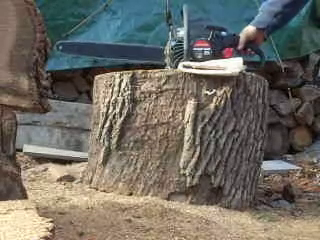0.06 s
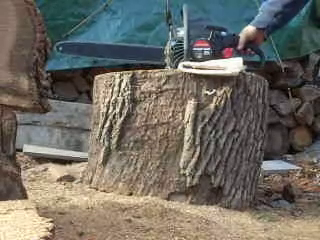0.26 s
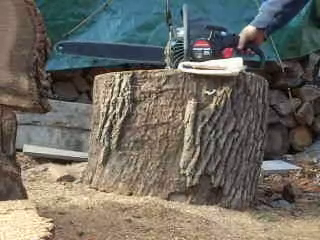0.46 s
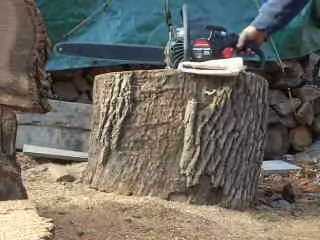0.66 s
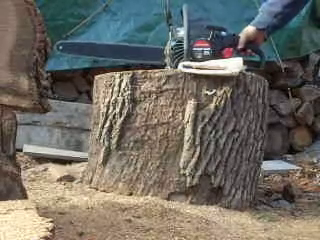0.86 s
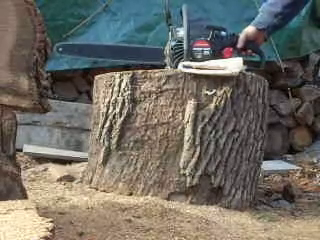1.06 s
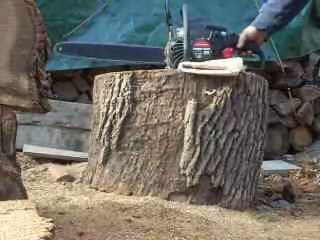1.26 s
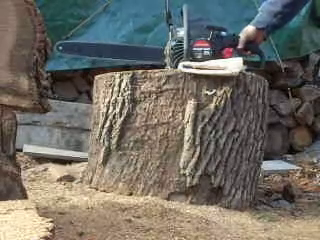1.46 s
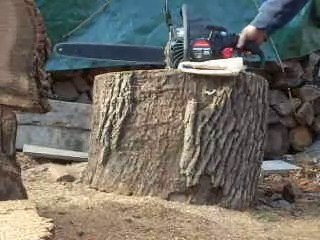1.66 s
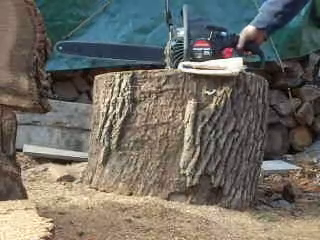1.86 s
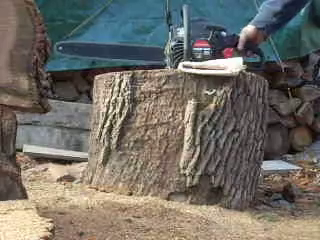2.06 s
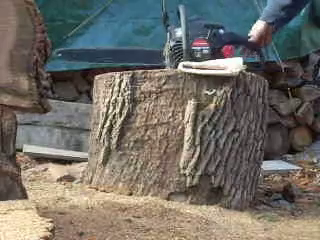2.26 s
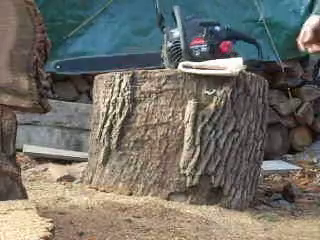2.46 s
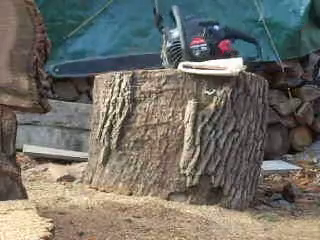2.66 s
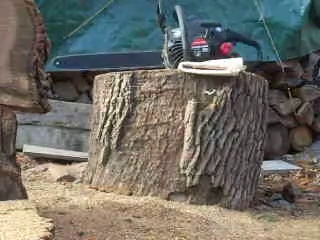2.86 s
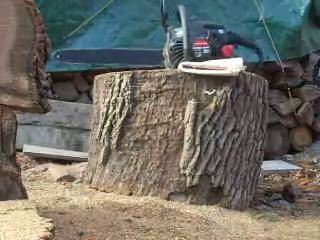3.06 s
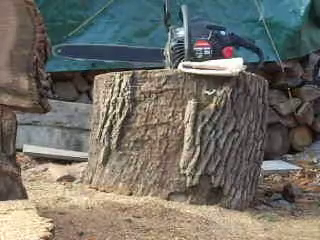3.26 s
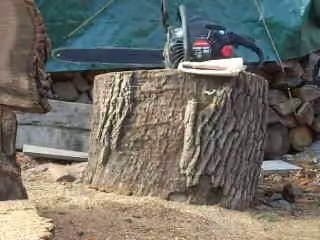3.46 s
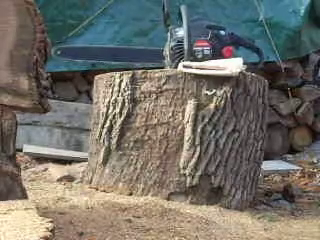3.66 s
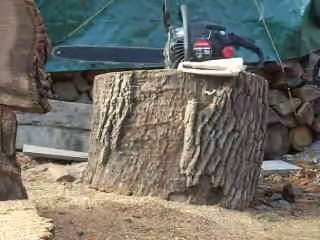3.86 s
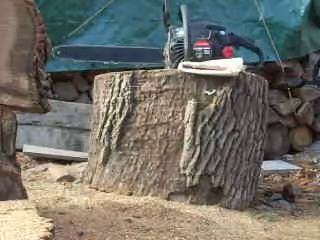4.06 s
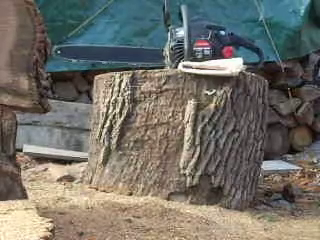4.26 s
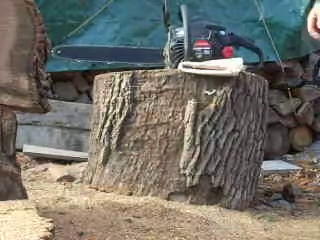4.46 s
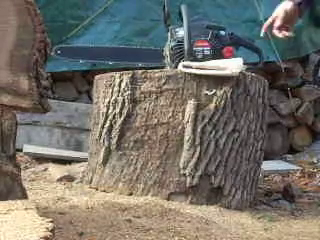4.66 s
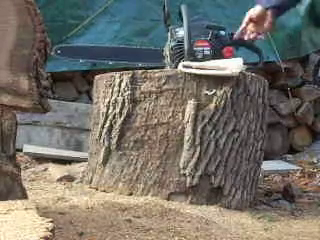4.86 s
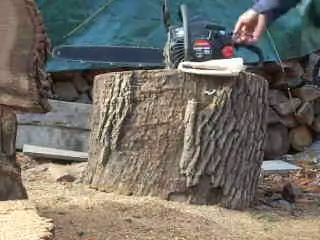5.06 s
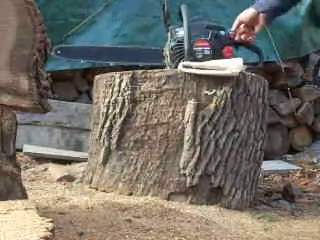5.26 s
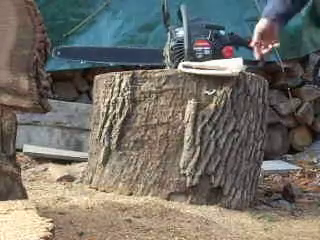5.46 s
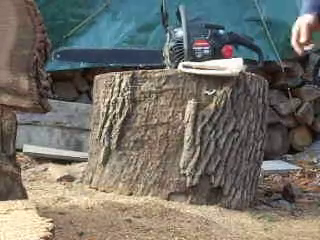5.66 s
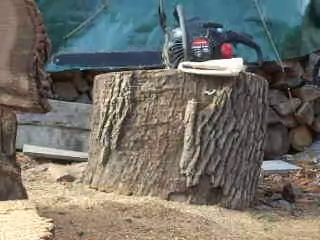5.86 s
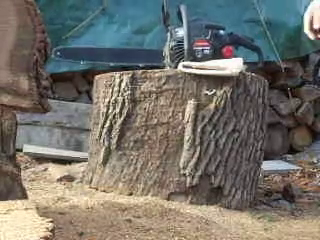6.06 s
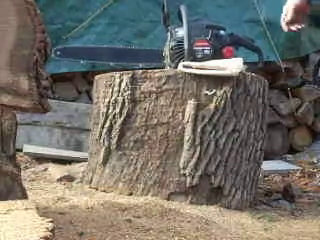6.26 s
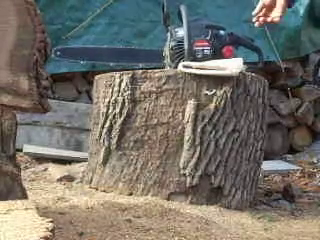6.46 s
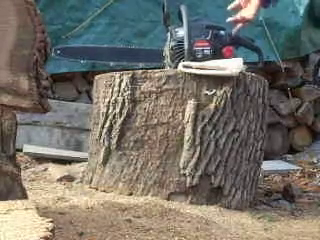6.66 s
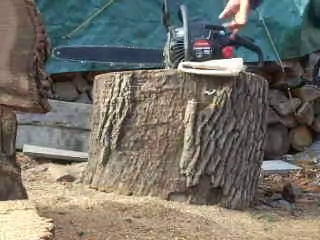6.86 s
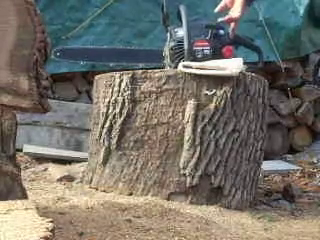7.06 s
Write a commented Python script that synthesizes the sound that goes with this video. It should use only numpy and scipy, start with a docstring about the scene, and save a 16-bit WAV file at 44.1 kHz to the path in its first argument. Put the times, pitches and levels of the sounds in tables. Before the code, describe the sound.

Five harsh, overloaded chainsaw revs, a sinking whine into clattering hit-and-miss idle, engine cut, a few dry metallic knocks, then quiet yard and faint buzz.

```python
"""Chainsaw blipped, idling and switched off

A small two-stroke saw is blipped five times, coasts to a rattling, hit-and-miss idle and is switched off.
Crank speed paces the exhaust pulses, whine and rattle; the chain's whine, idle cracks and last knocks are
timed singly. A breeze of filtered noise brushes the microphone of a tape camera, which buzzes faintly
from its drum and motors, has little treble and overloads on the revs."""
import sys
import numpy as np
from scipy.fft import rfft, irfft, next_fast_len
from scipy.io import wavfile
from scipy.ndimage import uniform_filter1d, map_coordinates

SR = 44100
rng = np.random.default_rng(int(sys.argv[2]) if len(sys.argv) > 2 else 0)


def transcribe(u):
    """Save the signal u as a 16-bit wav file named by the first command-line argument.

    u: samples, shape (n,) or (channels, n), limited to [-1, 1]; the rate is SR.
    q: integer samples, one column per channel.
    """
    v = np.clip(np.atleast_2d(u).T, -1, 1)
    q = np.round(v * 32767).astype(np.int16)
    wavfile.write(sys.argv[1], SR, q)


N = 313992

# Throttle blips. Each row: opening in seconds, shutting in seconds, speed reached in turns a second,
# easing exponent of the climb (1 = straight).
BLIPS = [(0.0, .41, 162.5, 1.03), (.712, .945, 164, 1.2), (1.309, 1.535, 162, 1.0),
         (1.661, 1.816, 164, 1.1), (1.91, 2.085, 170.5, 1.3)]
# Single firings at idle. Each row: time in seconds, relative level in dB.
IDLE_FIRINGS = [(3.5871, -17), (3.686, -16.5), (3.782, -15.5), (3.908, -13.5), (4.0168, -11), (4.1282, -12),
                (4.2414, -16), (4.334, -14), (4.3946, -14), (4.4882, -15.5), (4.5767, -17.5),
                (4.6437, -18.5), (4.7291, -12.5), (4.84, -11.5), (4.9428, -15), (5.062, -11.5),
                (5.1708, -18), (5.2747, -12)]
# Resonances of crankcase, clutch and bar. Each row: frequency in Hz, width in Hz, relative level in dB.
METAL_MODES = [(830, 310, -11.5), (1357, 430, -6.5), (2193, 323, -2), (2396, 136, 3), (2806, 400, -2.5),
               (3335, 100, -3), (3518, 198, -2.5), (3910, 670, -16)]
# Reference speed at which the speed-dependent levels are stated (turns a second).
FULL_SPEED = 160


def clock():
    """Sampling: the time of each sample (s)."""
    return np.arange(N) / SR


def amp(db):
    """Decibels are logarithmic: twenty of them are a tenfold gain."""
    return 10 ** (np.asarray(db) / 20)


def unit(x):
    """Normalisation by effective value: scale to rms 1."""
    return x / np.sqrt(np.mean(x ** 2) + 1e-20)


def wobble(rate):
    """Band-limited fluctuation: a smooth random curve through rate normal knots a second."""
    knots = rng.standard_normal(int(N * rate / SR) + 4)
    return map_coordinates(knots, [np.arange(N) * rate / SR])


def filtered(x, response):
    """Linear filtering: the spectrum of x times a complex response of frequency."""
    m = 2 * next_fast_len(N // 2 + SR // 4)
    return irfft(rfft(x, m) * response(np.fft.rfftfreq(m, 1 / SR)), m)[:N]


def coloured(x, points):
    """Minimum-phase filtering: a causal response through (Hz, dB) points on a log axis."""
    f, db = np.transpose(points)

    def response(hz):
        log_gain = np.log(amp(np.interp(np.log(hz + 1), np.log(f), db)))
        cepstrum = irfft(log_gain)
        half = len(cepstrum) // 2
        # folding the cepstrum onto positive time makes the filter causal
        cepstrum[1:half] *= 2
        cepstrum[half + 1:] = 0
        return np.exp(rfft(cepstrum))
    return filtered(x, response)


def ringing(x, modes):
    """Modal superposition: damped resonances (Hz, width Hz, dB), alternating in sign, add up."""
    def response(f):
        total = 0
        for k, (centre, width, db) in enumerate(modes):
            damping = 1j * f * width
            total = total + (-1) ** k * amp(db) * damping / (centre * centre - f * f + damping)
        return total
    return filtered(x, response)


def pulses(turns, jitter, scatter_db):
    """Periodic excitation: one impulse a turn, scattered in time (s) and size (dB)."""
    at = np.flatnonzero(np.diff(np.floor(turns)) > 0)
    chance = rng.standard_normal((len(at), 2))
    at = np.clip(at + np.round(chance[:, 0] * jitter * SR).astype(int), 0, N - 1)
    return np.bincount(at, amp(scatter_db * chance[:, 1]), N)


def steady(x):
    """Level equalisation: hold the slow rms of x near 1, leaving very quiet stretches below it."""
    power = np.abs(uniform_filter1d(x ** 2, size=SR // 10))
    return x / np.sqrt(power + np.mean(power) / 10 ** 2)


def bursts(rows, t60, hold):
    """Exponential decay: each (s, dB) row starts noise held for hold seconds, then falling 60 dB in t60."""
    out, t = np.zeros(N + SR), np.arange(SR // 8) / SR
    fall = amp(-60 * np.maximum(t - hold, 0) / t60)
    for s, db in rows:
        out[round(s * SR):][:len(t)] += amp(db) * fall * rng.standard_normal(len(t))
    return out[:N]


def by_speed(speed, full_db, doubling_db):
    """Power law: gain of full_db at FULL_SPEED, growing by doubling_db with each doubling of speed."""
    return amp(full_db + doubling_db * np.log2(speed / FULL_SPEED))


def swells(rows):
    """Gaussian envelopes: level (dB) of swells from (centre s, half length s, rise dB) rows."""
    return sum(db * np.exp(-((clock() - s) / half) ** 2) for s, half, db in rows)


def crank():
    """Rotational inertia: blips pull the speed (turns a second) up, it coasts down, idle firings nudge it."""
    start_speed, coast_speed = 99.5, 30  # at the first blip; tended to when coasting (turns a second)
    coast_s = .89  # time constant of coasting
    kick_speed = 3.5  # added by each idle firing (turns a second)
    switch_off_s, stall_s = 5.33, .435  # ignition cut; time constant of the stall
    t = clock()
    speed = np.full(N, float(start_speed))
    for opens, shuts, top, easing in BLIPS:
        start = np.interp(opens, t, speed)
        climb = top - (top - start) * np.interp(t, [opens, shuts], [1, 0]) ** easing
        coast = coast_speed + (top - coast_speed) * np.exp((shuts - t) / coast_s)
        speed = np.select([t < opens, t < shuts], [speed, climb], coast)
    for s, _ in IDLE_FIRINGS:
        speed = speed + kick_speed * (t > s) * np.exp((s - t) / coast_s)
    stall = np.exp(-np.maximum(t - switch_off_s, 0) / stall_s)
    return speed * stall * (1 + .003 * wobble(35))


def throttle():
    """Ignition gating: how fully the engine fires, 0 to 1, as it catches at each blip, holds and dies."""
    catch_s, die_s = .055, .021  # time for the burns to catch and to die
    t = clock()
    opening = np.zeros(N)
    for opens, shuts, _, _ in BLIPS:
        corners = [opens - catch_s / 2, opens + catch_s / 2, shuts - die_s / 2, shuts + die_s / 2]
        opening += np.interp(t, corners, [0, 1, 1, 0])
    return opening


def exhaust(turns, speed):
    """Pulsed-flow source: each turn puffs gas through the muffler; with open throttle it fires and barks."""
    # Muffler with the throttle open. Each row: frequency in Hz, level in dB.
    bark_points = [(70, -33.5), (115, -10.5), (160, -6), (250, 0), (330, 4), (400, -1.5), (480, -7.5),
                   (560, -2), (630, 4), (720, 5), (815, 5.5), (920, -15.5), (1300, -5.5), (2500, -14)]
    # Muffler with the throttle shut. Each row: frequency in Hz, level in dB.
    puff_points = [(70, -22), (140, -1), (200, -7), (300, -2.5), (460, -20.5), (620, -4.5), (780, -1),
                   (1020, -6), (1300, 3.5), (1750, -7.5), (2400, -3), (4200, -17.5)]
    # Rush of gas and cooling air. Each row: frequency in Hz, level in dB.
    rush_points = [(60, -10), (250, -4), (480, -1), (600, 4), (800, 6), (1050, 2), (1450, 3.5),
                   (1800, -4.5), (4200, -9)]
    # Muffler and air box at low speed. Each row: frequency in Hz, width in Hz, level in dB.
    hollow_modes = [(143, 33, 0), (235, 54, 1), (340, 89, -0.5), (814, 170, -7.5)]
    # Putter, strongest in a slow engine. Each row: speed in turns a second, level in dB.
    putter_by_speed = [(13, -83.5), (21, -44), (45, -34.5), (62, -39.5), (100, -45.5), (160, -62.5)]

    # with the throttle shut only weak, uneven burns remain
    weak_burns = by_speed(speed, full_db=-28, doubling_db=19.5) * amp(8 * np.tanh(wobble(16)))
    firing = amp(-3) * throttle() + weak_burns
    # no two burns are alike, which makes the bark rough
    burns = pulses(turns, jitter=.00008, scatter_db=2)
    bark = steady(coloured(burns, bark_points))
    strokes = pulses(turns, jitter=.00002, scatter_db=1.2)
    puff = steady(coloured(strokes, puff_points))
    hollow_strokes = pulses(turns, jitter=.00015, scatter_db=2)
    putter = steady(ringing(hollow_strokes, hollow_modes))
    putter_db = np.interp(speed, *np.transpose(putter_by_speed))
    # the jet from the port hisses once a turn
    jet = rng.standard_normal(N) * amp(1.9 * np.cos(2 * np.pi * turns - .8))
    rush = unit(coloured(jet, rush_points))

    puff = by_speed(speed, full_db=-10, doubling_db=25.5) * puff
    rush = by_speed(speed, full_db=-18, doubling_db=9) * rush
    return firing * bark + puff + rush + amp(putter_db) * putter


def whine(turns, speed):
    """Harmonic series: fan and ports sing on multiples of crank speed, each fluttering in level and phase."""
    # Radiation of the whine by the casing. Each row: frequency in Hz, level in dB.
    casing_points = [(400, -24.5), (520, -13.5), (610, -1), (770, 6.5), (860, 4.5), (1000, -4), (1280, 3.5),
                     (1750, -5), (2450, -1), (3000, -7)]
    lines = np.zeros(N)
    for k in range(4, 20):
        phase = 2 * np.pi * (k * turns + rng.random()) + .35 * wobble(60)
        lines += amp(3.2 * wobble(32)) * np.sin(phase)
    level = by_speed(speed, full_db=-11, doubling_db=21.5) * amp(1.1 * wobble(25))
    return level * steady(coloured(lines, casing_points))


def rattle(turns, speed):
    """Impact excitation: piston slap each turn and dense contacts of clutch and chain ring the metal."""
    # Louder clatter of the slack chain as it runs out and as the engine stalls.
    # Each row: centre in seconds, half length in seconds, rise in dB.
    slack_swells = [(3.35, 0.32, 5), (5.56, 0.19, 6.5)]
    slap = steady(ringing(pulses(turns, jitter=.00003, scatter_db=2), METAL_MODES))
    contacts = rng.standard_normal(N) * (rng.random(N) < 9000 / SR)  # about 9000 a second
    # at low speed the loose parts settle between turns, so each turn ticks on its own
    depth = np.interp(speed, [70, 120], [1.8, .5])
    shaken = 1 + depth * np.exp(-(turns % 1) / .16)
    clatter = steady(ringing(contacts * shaken, METAL_MODES))
    # the slap is hardest at high speed
    slap_db = np.interp(speed, [80, 140], [-10, 0])
    level = by_speed(speed, full_db=-9, doubling_db=15.5) * amp(swells(slack_swells) + .7 * wobble(70))
    return level * (amp(slap_db) * slap + clatter)


def air():
    """Turbulent pressure: lumpy wind noise with a few gusts dies down over the quiet of the yard."""
    # Wind on the microphone. Each row: frequency in Hz, level in dB.
    buffet_points = [(12, -30), (20, -4), (49, 1.5), (103, -3), (162, -7), (400, -14.5), (520, -18.5),
                     (880, -120)]
    # Quiet yard. Each row: frequency in Hz, level in dB.
    yard_points = [(20, -2), (60, -9), (150, -11.5), (380, -12), (500, -16.5), (1000, -18.5), (2000, -24),
                   (3500, -31), (4400, -45.5)]
    # Gusts on top of the breeze. Each row: centre in seconds, half length in seconds, rise in dB.
    gust_swells = [(2.05, 0.51, 3.5), (3.342, 0.13, 6.5), (3.97, 0.18, 10), (4.455, .25, 2)]
    breeze_db, calm_s, calm_db_per_s = -33, 4.72, 18  # level; start and rate of the drop
    calming_db = calm_db_per_s * np.maximum(clock() - calm_s, 0)
    wind_db = breeze_db + swells(gust_swells) - calming_db
    lumps = unit(coloured(rng.standard_normal(N), buffet_points) * amp(3 * wobble(45)))
    yard = unit(coloured(rng.standard_normal(N), yard_points))
    return amp(wind_db) * lumps + amp(-47.0) * yard


def camera_buzz():
    """Periodic forcing: the tape drum gives a push and a duller pull on each turn; the motors hum."""
    # Motor hum. Each row: frequency in Hz, mean level in dB.
    motor_lines = [(152, -57), (240, -67.5), (343, -64.5), (389, -65.5), (505, -67.5), (1000, -70)]
    drum_hz = 29.97
    t = clock()
    turns = t * drum_hz
    push_pulses = pulses(turns + .05, jitter=.00005, scatter_db=.8)
    pull_pulses = pulses(turns + .5, jitter=.00005, scatter_db=.6)
    # three equal low-pass stages soften each pulse
    push = filtered(push_pulses, lambda f: 1 / (1 + 1j * f / 400) ** 3)
    pull = filtered(pull_pulses, lambda f: 1 / (1 + 1j * f / 260) ** 3)
    hum = np.zeros(N)
    for hz, db in motor_lines:
        tone = unit(np.sin(2 * np.pi * hz * t + .4 * wobble(2.6)))
        hum += amp(db + wobble(3)) * tone
    return amp(-50.5) * unit(push) - amp(-45.5) * unit(pull) + hum


def chain():
    """Tooth-passing tone: the clutch lets go and the chain's whine on the sprocket sinks steadily."""
    loudest_s, loudest_db, fade_db_per_s = 3.35, -34.5, 26  # fades on either side of its loudest moment
    loudest_hz, sag_hz_per_s = 1035, 1010  # mean tooth rate at that moment and how fast it sinks
    since = clock() - loudest_s
    tooth_hz = np.maximum(loudest_hz - sag_hz_per_s * since, 0)
    phase = 2 * np.pi * np.cumsum(tooth_hz * (1 + .012 * wobble(120))) / SR
    level_db = loudest_db - fade_db_per_s * np.abs(since) + 2 * wobble(40)
    return amp(level_db) * np.sqrt(2) * np.sin(phase)


def idle_firings():
    """Impulse response: about every sixth idle turn a firing cracks and its jolt makes loose parts clatter."""
    # Crack of a single firing. Each row: frequency in Hz, level in dB.
    crack_points = [(200, -7.5), (800, -2.5), (1800, -3.5), (2300, 6), (4200, 4)]
    jolts = bursts(IDLE_FIRINGS, t60=0.16, hold=0.0012)
    cracks = bursts(IDLE_FIRINGS, t60=.03, hold=.002)
    return amp(2) * ringing(jolts, METAL_MODES) + amp(-5) * coloured(cracks, crack_points)


def last_knocks():
    """Gas-spring rebound: without spark the piston bounces off its compression and knocks to rest."""
    # Knocks of the stopping crank and clutch. Each row: time in seconds, relative level in dB.
    knock_rows = [(5.501, -21), (5.585, -22), (5.624, -24), (5.637, -29), (5.722, -14.5), (5.802, -16.5),
                  (5.851, -36), (5.905, -30.5), (5.941, -23.5), (6.044, -38)]
    # Colour of the knocks. Each row: frequency in Hz, level in dB.
    knock_points = [(180, -40), (300, -25), (745, -6), (1260, -1), (1660, -11), (1940, 0), (2650, -4.5),
                    (2870, 1), (3180, -3), (3760, -5.5), (4400, -29), (5720, -54), (9680, -120)]
    return amp(4) * coloured(bursts(knock_rows, t60=0.031, hold=0.0026), knock_points)


def scene():
    """Superposition: the sounds of the saw add to the air and the camera's own buzz."""
    speed = crank()
    turns = np.cumsum(speed) / SR
    saw = exhaust(turns, speed) + whine(turns, speed) + rattle(turns, speed)
    saw = saw + chain() + idle_firings() + last_knocks()
    return (saw + air() + camera_buzz())[None]


def overload(x, top, hardness):
    """Saturation: peaks round off against a ceiling, more abruptly with greater hardness."""
    return x / (1 + np.abs(x / top) ** hardness) ** (1 / hardness)


def record(dry):
    """Nonlinear, band-limited channel: the input saturates, the treble is cut, the output clips the rest."""
    # Treble roll-off of the camera. Each row: frequency in Hz, level in dB.
    treble_points = [(4000, 0), (4250, -4.5), (4500, -21), (4750, -85)]
    top_hz = 15900  # nothing passes from here up
    saturated = overload(amp(0.5) * dry[0], top=0.95, hardness=1.426)
    narrow = coloured(saturated, treble_points)
    clipped = overload(narrow, top=.75, hardness=14)
    return filtered(clipped, lambda hz: hz < top_hz)[None]


dry = scene()
out = record(dry)
transcribe(out)
```